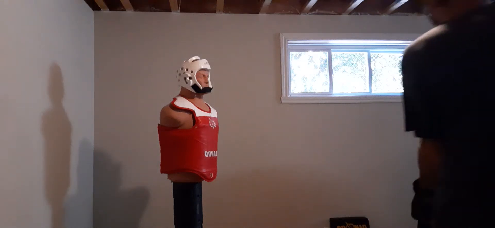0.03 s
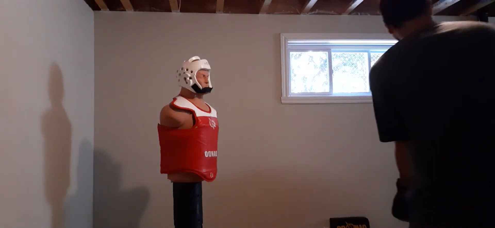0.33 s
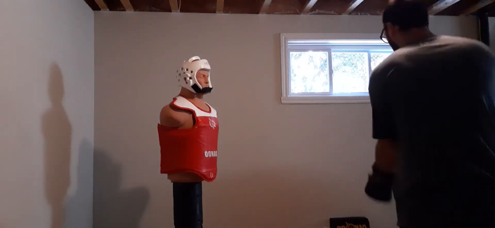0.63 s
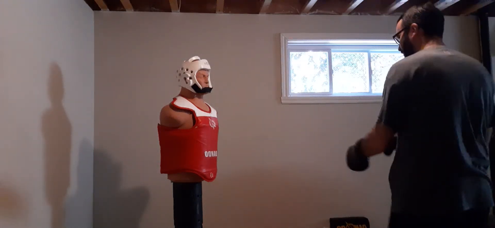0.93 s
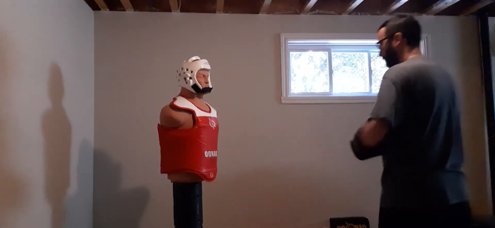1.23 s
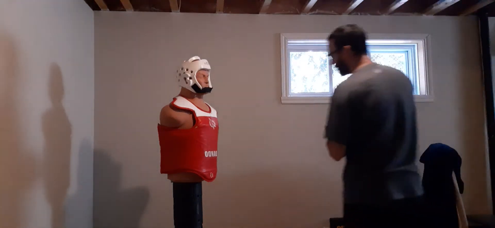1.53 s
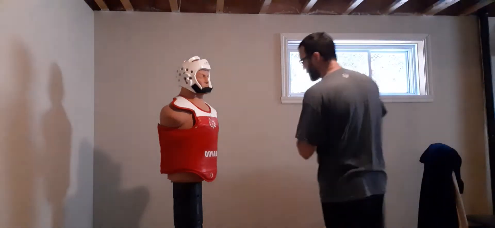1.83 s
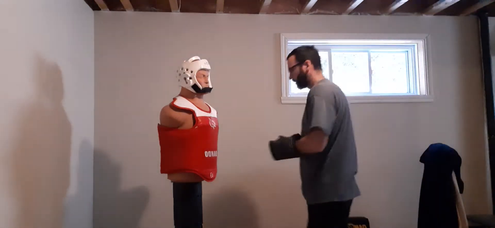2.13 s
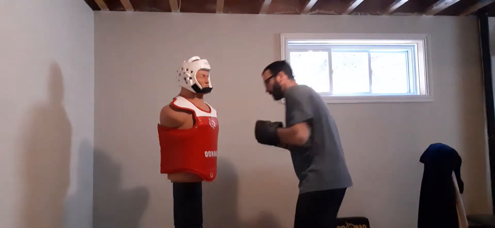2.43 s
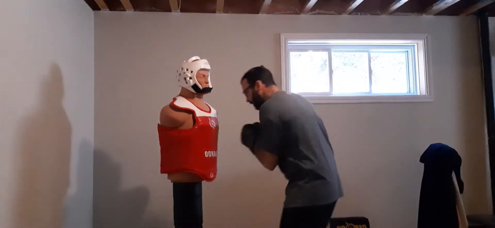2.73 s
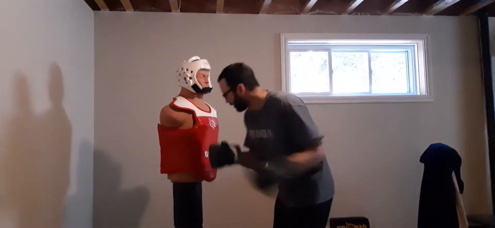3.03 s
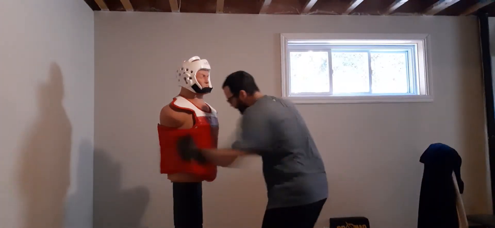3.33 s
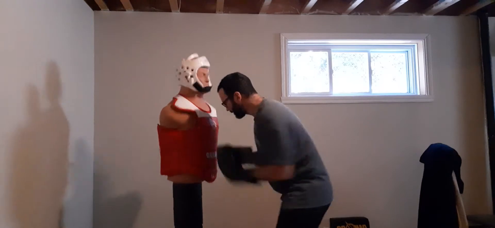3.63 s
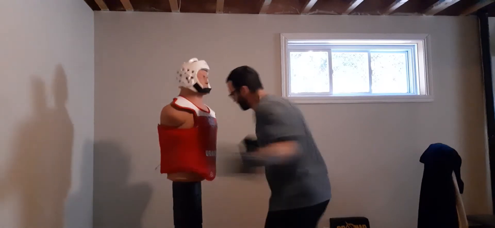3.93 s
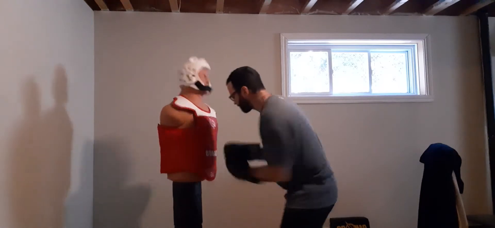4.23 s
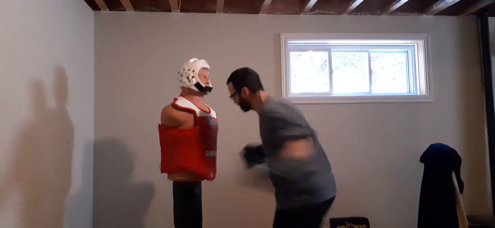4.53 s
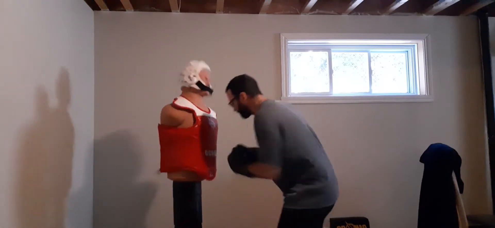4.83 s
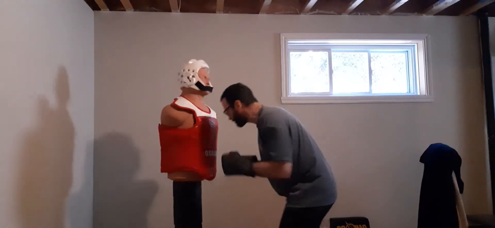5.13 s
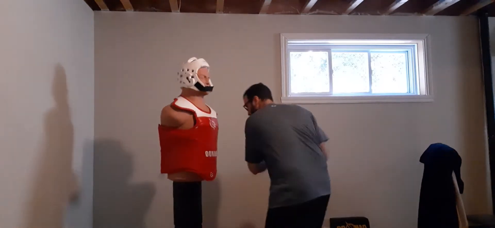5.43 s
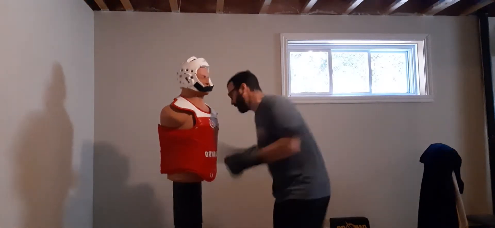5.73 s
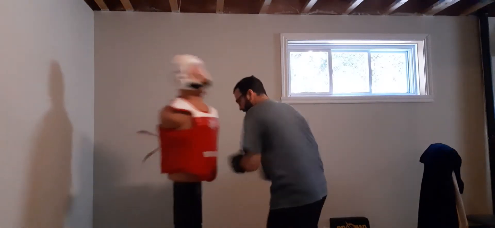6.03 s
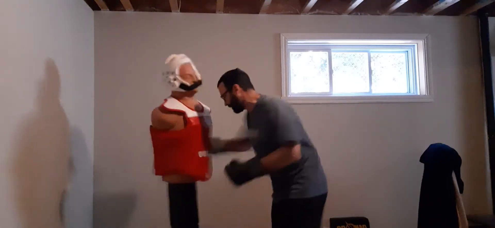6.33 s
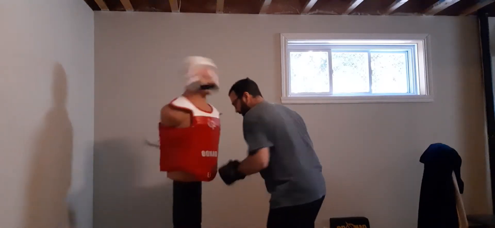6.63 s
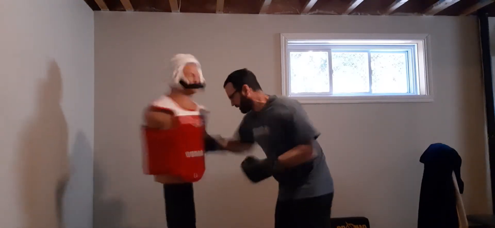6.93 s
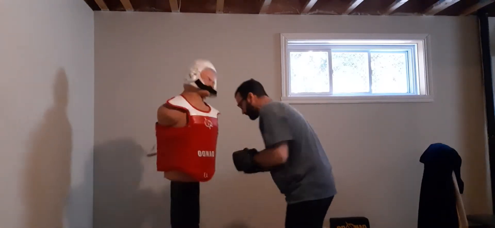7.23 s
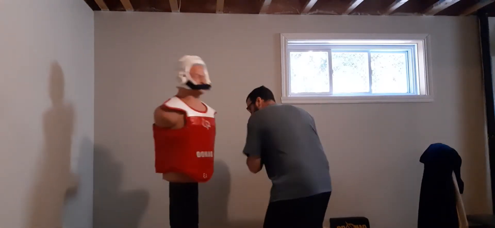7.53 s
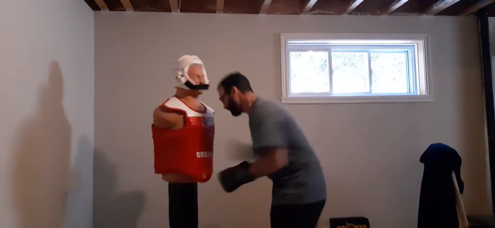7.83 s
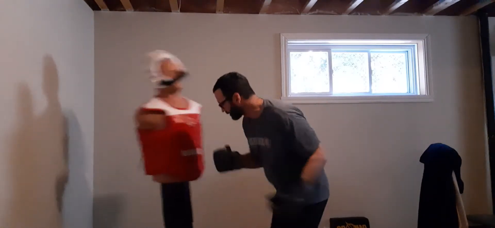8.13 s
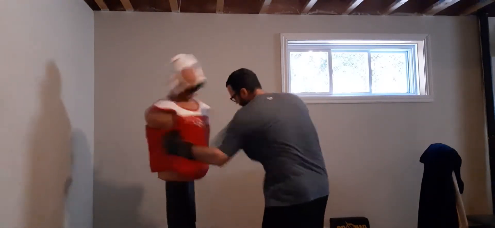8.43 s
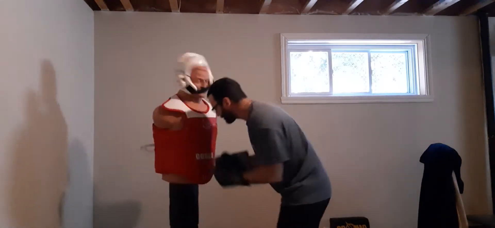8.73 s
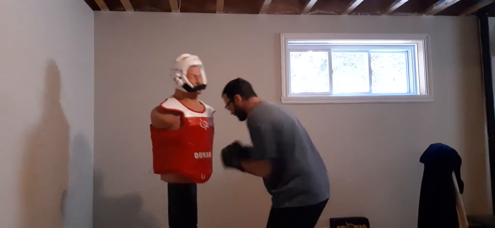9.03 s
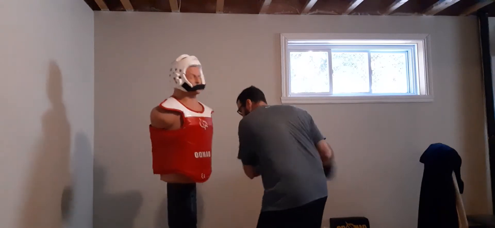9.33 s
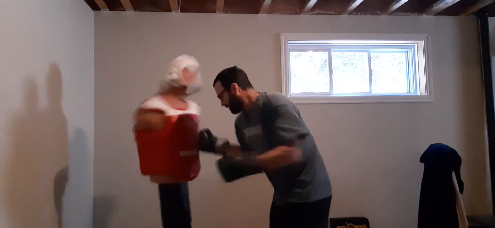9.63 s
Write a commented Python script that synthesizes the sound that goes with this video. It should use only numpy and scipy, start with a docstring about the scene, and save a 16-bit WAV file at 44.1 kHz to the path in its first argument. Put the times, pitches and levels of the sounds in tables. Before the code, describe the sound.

In a small, bare room, nine punches from boxing gloves pop and slap against a padded dummy, about half a second to a second apart. Before them come only quiet steps, light taps and swishing clothes. After each hit the dummy's base knocks dully and its vest rustles, while soles slide now and then. The blows are loud and close in stereo, with a short echo off the walls.

```python
"""Clothes swish and shoes scuff close to a stereo microphone in a small, bare basement room: a boxer
shuffles up to a padded dummy, then lands nine gloved punches in quick flurries. Each is a low push,
a hollow pop of the glove and a slap of vinyl. The dummy rocks on its base, knocking faster and fainter
while its vest rustles, until it settles or the next punch lands. The walls ring, and the microphones
overload on the blows."""
import sys
import numpy as np
from scipy import signal
from scipy.fft import rfft, irfft, next_fast_len
from scipy.io import wavfile

SR = 44100
rng = np.random.default_rng(int(sys.argv[2]) if len(sys.argv) > 2 else 0)


def inscribe(sig):
    """Save sig as 16-bit PCM at rate SR to the path in sys.argv[1].

    A 1-D sig is mono; a 2-D sig holds one channel per row.
    Samples are clipped to [-1, 1] before scaling.
    """
    pcm = np.round(np.clip(np.atleast_2d(sig).T, -1, 1) * 32767)
    wavfile.write(sys.argv[1], SR, pcm.astype(np.int16))


N = 436590

# the blows, levels before each layer's gain: (time [s], pop pitch [Hz], pop [dB], thud [dB], chest [dB],
# slap [dB], fold [dB], time to tip back [s], back knock [dB], forward knock [dB])
PUNCHES = [(3.3888, 608, -17, -25, -25.5, -22.5, -32, 0.23, -38, -45),
           (4.0245, 540, -14.5, -27, -27, -22.5, -27.5, .238, -37.5, -64.5),
           (4.6405, 562, -15, -25.5, -31.5, -22, -24.5, 0.24, -34.5, -54.5),
           (5.7811, 588, -17.5, -28, -30.5, -29, -46, .261, -38, -43.5),
           (6.3535, 622, -17, -25, -21, -23.5, -23.5, 0.25, -39.5, -47),
           (6.9278, 566, -19, -23.5, -22.5, -22, -38, .243, -41.5, -47.5),
           (7.89, 650, -15.5, -25, -26.5, -23.5, -26, .306, -29, -52.5),
           (8.4124, 609.3, -16, -27, -23.5, -26, -22.5, 0.24, -37.5, -35.5),
           (9.6032, 652, -15, -30.5, -26, -21.5, -22, .289, -36, -48)]
# spectra of rubbing cloth, a light touch and a heavy push: (frequency [Hz], level [dB])
CLOTH = [(400, -34), (1300, 2.5), (2100, 1.5), (4000, -2.5), (6500, -3.5), (8500, -9), (12000, -6.5),
         (16000, -13)]
TAP = [(60, -20.5), (160, -6), (250, -2), (600, -1), (1500, -4), (1900, -17.5), (4000, -40.5), (8000, -54)]
THUD = [(20, -42), (32, -16.5), (46, 0.5), (90, 0), (160, 1.5), (300, -6), (500, -16.5), (1500, -29.5),
        (5000, -96)]


def amp(db):
    """Decibels to gain."""
    return 10 ** (np.asarray(db) / 20)


def unit(x):
    """x at rms 1."""
    return x / np.sqrt(np.mean(x ** 2) + 1e-20)


def along(points, hz):
    """(frequency, value) points read on a log axis."""
    f, v = np.transpose(points)
    return np.interp(np.log(hz + 1), np.log(f + 1), v)


def add(track, s, x):
    """Mix x into track from time s."""
    i = max(0, round(s * SR))
    part = x[..., :max(0, track.shape[-1] - i)]
    track[..., i:i + part.shape[-1]] += part


def coloured(x, spectrum, size=4096):
    """x through a minimum-phase filter with the given spectrum, at energy 1."""
    cepstrum = irfft(np.log(amp(along(spectrum, np.fft.rfftfreq(size, 1 / SR)))))
    cepstrum[1:size // 2] *= 2
    cepstrum[size // 2 + 1:] = 0
    y = signal.fftconvolve(x, irfft(np.exp(rfft(cepstrum))))[:len(x)]
    return y / np.linalg.norm(y)


def diffuse(x, spectrum):
    """Two unrelated signals as a field at the microphones: alike in the bass, apart in the treble."""
    # likeness of left and right: (frequency [Hz], correlation [0..1])
    alike = [(100, 0.96), (200, 0.94), (350, 0.73), (700, 0.37), (1400, 0.096), (4000, 0.053),
             (16000, 0.13)]
    hz = np.fft.rfftfreq(x.shape[1], 1 / SR)
    turn = np.arccos(np.clip(along(alike, hz), -1, 1)) / 2
    mid, side = irfft(rfft(x) * amp(along(spectrum, hz)) * [np.cos(turn), np.sin(turn)], x.shape[1])
    return np.array([mid + side, mid - side])


def room(x, direct_db, build_s, ring, walls_db=-11, tail_db=-2, modes_db=-8, wall_hz=3500):
    """A short sound across the basement: direct path, echoes, modes and tail; ring scales the decays."""
    # decay of the diffuse tail: (frequency [Hz], t60 [s])
    tail_t60 = [(60, 0.3), (300, 0.6), (700, 0.56), (1500, 0.61), (4000, 0.57), (7000, 0.51), (11000, 0.43),
                (16000, 0.36)]
    # colour of the tail: (frequency [Hz], level [dB])
    tail_colour = [(30, -45.5), (60, 8), (150, 0), (400, -1), (1500, 2), (5000, 1), (16000, -6)]
    # early echoes from floor, ceiling and walls: (delay [s], level [dB], left lead [s])
    walls = [(.0015, -16.5, 0), (.0048, -34.5, .0001), (.007, -8.5, -.0002), (0.0156, -6.5, .0003),
             (.019, -13.5, -.0001), (0.0264, -15.5, .0002), (.033, -4, -.0003), (0.0537, -6, .0001)]
    # standing waves: (frequency [Hz], level [dB], t60 [s])
    modes = [(51.4, -43, 0.7), (71.5, -43, 0.18), (82.7, -39, 0.37), (125.3, -43.5, 0.39),
             (184.6, -49, 0.54), (230.4, -46.5, 0.45), (290.8, -50, 0.5), (357.7, -42, 0.4),
             (458.3, -41.5, 0.45), (570, -55.5, 0.62), (689, -43, 0.3)]
    t = np.arange(SR * 3 // 4) / SR
    hz, frames, noise = signal.stft(rng.standard_normal((2, len(t))), SR, nperseg=256)
    decay = amp(-60 * frames / ring / along(tail_t60, hz)[:, None])
    tail = signal.istft(noise * decay, SR, nperseg=256)[1][:, :len(t)]
    tail = diffuse(tail * (1 - np.exp(-t / build_s)), tail_colour)
    response = amp(tail_db) * tail / np.linalg.norm(tail[0])
    echoes = np.zeros_like(response)
    for delay, db, lead in walls:
        arrival = delay + .00025 * rng.standard_normal()  # no two blows land on the same spot
        add(echoes[0], arrival - lead / 2, amp([db]))
        add(echoes[1], arrival + lead / 2, amp([db]))
    soften = np.exp(-2 * np.pi * wall_hz / SR)  # the bounce loses treble
    response += amp(walls_db) * signal.lfilter([1 - soften], [1, -soften], echoes)
    swell = 1 - np.exp(-t / .018)
    for mode_hz, db, t60 in modes:
        envelope = swell * amp(modes_db + db + 2 * rng.standard_normal() - 60 * t / ring / t60)
        response += envelope * np.sin(2 * np.pi * mode_hz * t)
    response[:, 0] += amp(direct_db)
    fade = 1 - (t / t[-1]) ** 8
    return signal.fftconvolve(x[None], response * fade, axes=1)


def room_tone(level_db=-65, shuffle_db=-63, shuffle_s=.51, shuffle_width_s=.65):
    """The faint steady rush of the basement, and the boxer's first slow shuffle beside the microphones."""
    # the still room: (frequency [Hz], level [dB])
    rush = [(15, -33.5), (25, -18), (134, -4), (236, -18.5), (796, -11.5), (911, -22.5), (1400, -12.5),
            (2760, -29.5), (4490, -23.5), (6560, -30.5), (9320, -41), (12900, -36), (16000, -42.5)]
    hush = amp(level_db) * unit(diffuse(rng.standard_normal((2, N)), rush))
    near = np.exp(-((np.arange(N) / SR - shuffle_s) / shuffle_width_s) ** 2)
    return hush + amp(shuffle_db) * near * unit(diffuse(rng.standard_normal((2, N)), TAP))


def rub(spectrum, s, width_s, wet, ring_t60, grain_db):
    """A stroke of grainy friction around time s, drawn out by the room. Returns start time and sound."""
    t = np.arange(SR * 3 // 4) / SR - 1 / 4
    stroke = np.exp(-(t / width_s) ** 2)
    keep = amp(-120 / (ring_t60 * SR))  # share of the power left after one sample
    power = stroke + wet * signal.lfilter([1 - keep], [1, -keep], stroke)
    noise = rng.standard_normal((2, len(t)))
    grains = amp(grain_db * np.repeat(rng.uniform(-1, 1, len(t)), 32)[:len(t)])
    sound = unit(diffuse(noise * grains, spectrum)) * np.sqrt(power / power.max())
    return s + t[0], sound[:, s + t >= 0]


def swish(s, width_s, hiss_db, body_db):
    """Cloth slides over cloth: fine grains swell and fade around time s. Returns start time and sound."""
    start, hiss = rub(CLOTH, s, width_s, wet=1.2, ring_t60=.48, grain_db=5)
    start, body = rub(TAP, s, width_s, wet=1.2, ring_t60=.48, grain_db=5)
    return start, amp(hiss_db) * hiss + amp(body_db) * body


def shirt(sleeve_lead_s=.02):
    """The shirt swishes with each big move, and a sleeve just before each punch lands."""
    # the boxer turns and raises his guard: (time [s], half length [s], hiss [dB], body [dB])
    moves = [(.04, 0.17, -60.5, -60.5), (0.577, 0.039, -51, -47), (1.456, 0.06, -58, -58.5),
             (1.84, 0.13, -73, -59.5), (2.169, 0.052, -63.5, -60), (2.324, 0.032, -52.5, -58.5),
             (2.975, 0.05, -54, -57.5), (3.121, 0.021, -43.5, -63), (3.213, .05, -56.5, -60.5),
             (9.075, 0.075, -52, -51.5)]
    out = np.zeros((2, N))
    for move in moves:
        add(out, *swish(*move))
    for s, *_ in PUNCHES:
        add(out, *swish(s - sleeve_lead_s, width_s=.012, hiss_db=-57, body_db=-57))
    return out


def contact(spectrum):
    """One push of air, shaped by the softness of what meets."""
    return coloured(signal.unit_impulse(SR // 4), spectrum)


def tap(body_db, scuff_db):
    """One soft, brief contact heard through the room."""
    touch = amp(body_db) * contact(TAP) + amp(scuff_db) * contact(CLOTH)
    return room(touch, direct_db=-15, build_s=.004, ring=.7)


def fidget(body_db=-33, scuff_db=-37, spread_db=5, count=30):
    """The boxer is never still: gloves and soles tick faintly at random."""
    out = np.zeros((2, N))
    for when, body, scuff in rng.random((count, 3)):
        add(out, when * N / SR, tap(body_db - spread_db * body, scuff_db - spread_db * scuff))
    return out


def taps(body_gain_db=31, scuff_gain_db=30):
    """Gloves touch and soles catch on the way to the dummy."""
    # footfalls and light touches of the gloves: (time [s], body [dB], scuff [dB])
    touches = [(.732, -47.5, -48), (.915, -36.5, -39), (.925, -40.5, -38), (0.991, -55, -51),
               (1.223, -51, -55.5), (1.574, -56, -44), (1.775, -63, -61.5), (2.145, -72, -52.5),
               (2.525, -59, -68), (2.645, -58.5, -59.5), (2.809, -51, -47)]
    out = np.zeros((2, N))
    for s, body_db, scuff_db in touches:
        add(out, s, tap(body_db + body_gain_db, scuff_db + scuff_gain_db))
    return out


def slides(body_gain_db=22, scuff_gain_db=29, chafe_gain_db=-3, chafe_lag_s=.015):
    """A sole lands and slides a little; stick and slip gathers the friction into one narrow band."""
    # sliding steps: (time [s], level [dB], chafing note [Hz])
    steps = [(0.822, -51, 2190), (1.374, -64, 1790), (3.19, -45, 2300), (5.469, -53, 2430),
             (5.719, -50, 2330), (7.791, -53.5, 2210), (9.31, -49.5, 2350), (9.546, -49, 2400)]
    out = np.zeros((2, N))
    for s, db, hz in steps:
        add(out, s, tap(db + body_gain_db, db + scuff_gain_db))
        band = [(hz / 4, -70), (hz / 1.35, -20), (hz, 0), (hz * 1.35, -16), (hz * 4, -50)]
        start, chafe = rub(band, s + chafe_lag_s, width_s=.014, wet=1, ring_t60=.33, grain_db=8)
        add(out, start, amp(db + chafe_gain_db) * chafe)
    return out


def cushioned(x, cutoff_hz=2800):
    """A soft contact carries no sharp edge."""
    return signal.sosfilt(signal.butter(3, cutoff_hz, fs=SR, output="sos"), x)


def bump(thud_db, knock_db):
    """One dull, low bump with a short ring."""
    # spectrum of the knock: (frequency [Hz], level [dB])
    knock = [(50, -9), (130, -9.5), (280, 1.5), (450, -6), (800, -7), (1500, -15), (2000, -29.5),
             (6000, -20.5), (16000, -38.5)]
    impact = amp(thud_db) * contact(THUD) + amp(knock_db) * contact(knock)
    return room(cushioned(impact), direct_db=-12, build_s=.005, ring=.55)


def low_knocks(thud_gain_db=33, knock_gain_db=31):
    """Scattered dull, low knocks, mostly the dummy rocking or rebounding."""
    # single dull knocks: (time [s], level [dB])
    knocks = [(2.376, -58), (3.797, -52), (6.262, -48), (6.489, -36), (7.689, -54), (9.36, -59)]
    out = np.zeros((2, N))
    for s, db in knocks:
        add(out, s, bump(db + thud_gain_db, db + knock_gain_db))
    return out


def glove_pop(hz, t60=.013):
    """The air trapped under the glove rings for a few cycles."""
    # colour of the pop: (frequency [Hz], level [dB])
    hollow = [(40, -19.5), (200, -15.5), (380, 6.5), (550, 1.5), (760, 5), (950, 2), (1500, 4.5),
              (1850, 11), (4000, -24.5), (12000, -38.5)]
    t = np.arange(SR // 4) / SR
    return coloured(np.cos(2 * np.pi * hz * t) * amp(-60 * t / t60), hollow)


def heave(hz=52, peak_s=.024, width_s=.023):
    """The whole torso gives way and shoves the air for a cycle or two."""
    t = np.arange(SR // 8) / SR
    return np.sin(2 * np.pi * hz * t) * np.exp(-((t - peak_s) / width_s) ** 2)


def crumple(spectrum, rise_s, t60, grain_db):
    """Vinyl or foam gives in a brief spray of tiny snaps, at energy 1 in each microphone."""
    t = np.arange(SR // 4) / SR
    noise = rng.standard_normal((2, len(t)))
    snaps = noise * amp(grain_db * np.repeat(rng.standard_normal(len(t)), 16)[:len(t)])
    shape = (1 - np.exp(-t / rise_s)) * amp(-60 * t / t60)
    return np.array([coloured(side * shape, spectrum) for side in snaps])


def punches(fold_delay_s=.0037, rebound_delay_s=.134):
    """Padding takes the push, chest and glove pop, vinyl slaps and folds; the torso swings on its post."""
    # spectra of the hollow chest, the vinyl's slap and crack, and the torso meeting its post:
    # (frequency [Hz], level [dB])
    chest = [(60, -19.5), (200, -7.5), (320, -3), (420, -13.5), (800, -39), (3000, -56)]
    slap = [(300, -49), (1000, 3.5), (1500, 17), (1900, 5), (3800, 5.5), (6500, -2), (9000, -7.5),
            (16000, -10)]
    crack = [(2000, -39), (6000, -10), (8500, -13.5), (11500, -6.5), (14000, -8), (16000, -16)]
    post = [(40, 1), (70, -2), (130, 2.5), (300, -2.5), (420, -24), (1000, -9), (2000, -27.5),
            (8000, -77.5)]
    out = np.zeros((2, N))
    for s, pop_hz, pop_db, thud_db, chest_db, slap_db, fold_db, *_ in PUNCHES:
        blow = amp(thud_db + 33) * contact(THUD)
        blow += amp(chest_db + 33) * contact(chest)
        blow += amp(pop_db + 34.5) * glove_pop(pop_hz)
        blow += amp(slap_db + 35) * contact(slap)
        add(out, s, room(-blow, direct_db=-14, build_s=.0016, ring=.84))
        # the heave and the first bite of leather on vinyl reach the microphones directly
        add(out, s, amp(thud_db + 5) * heave())
        add(out, s, -amp(slap_db + 20) * contact(slap))
        add(out, s, amp(slap_db + 25) * crumple(slap, rise_s=.0002, t60=.014, grain_db=3))
        fold_s = s + fold_delay_s
        snap = amp(9.5) * contact(crack)  # equally strong in every punch
        add(out, fold_s, room(snap, direct_db=-23.5, build_s=.00044, ring=.78))
        add(out, fold_s, amp(fold_db + 28) * crumple(crack, rise_s=.001, t60=.018, grain_db=3))
        rebound = amp(thud_db + 24) * cushioned(contact(post))
        add(out, s + rebound_delay_s, room(rebound, direct_db=-5, build_s=.002, ring=.5))
    return out


def until_next():
    """Each punch with the time at which the next one, or the end, cuts its motion short."""
    return zip(PUNCHES, [row[0] for row in PUNCHES[1:]] + [N / SR])


def rocking_base(thud_gain_db=30, knock_gain_db=35, first_gap_s=.206, gap_shrink=.82, rock_loss_db=12.5):
    """The weighted base tips back, forward and back again, quicker and weaker, jolting the head guard."""
    out = np.zeros((2, N))
    for (s, *_, tip_s, back_db, forward_db), end in until_next():
        s += tip_s
        for k in range(3):
            db = (back_db, forward_db)[k % 2] - rock_loss_db * (k // 2)
            if s < end:
                add(out, s, bump(db + thud_gain_db, db + knock_gain_db))
                add(out, s, rattle(db))
            s += first_gap_s * gap_shrink ** k
    return out


def rattle(jolt_db, follows=.65, gain_db=8):
    """Straps and foam of the head guard chatter, following only part of the jolt's level."""
    return amp(follows * jolt_db + gain_db) * crumple(CLOTH, rise_s=.008, t60=.4, grain_db=4.5)


def vest(hiss_db=-50, body_db=-52, width_s=.051, first_s=.245, swing_s=.205, swing_loss_db=3.5, count=4):
    """The vest and head guard rustle at every swing of the dummy, fainter each time."""
    out = np.zeros((2, N))
    for (s, *_), end in until_next():
        for k in range(count):
            turn_s = s + first_s + k * swing_s
            loss_db = k * swing_loss_db
            if turn_s < end:
                add(out, *swish(turn_s, width_s, hiss_db - loss_db, body_db - loss_db))
    return out


def scene():
    """Dummy, boxer and basement, a little stronger in the right microphone."""
    dummy = punches() + rocking_base() + vest() + low_knocks()
    boxer = taps() + slides() + shirt() + fidget()
    return (dummy + boxer + room_tone()) * amp([[-.2], [.2]])


def record(dry, ceiling=.95, low_cut_hz=36, top_hz=16150, taper_hz=400):
    """The microphones round off the peaks of the blows and lose the deepest bass and highest treble."""
    squeezed = dry / (1 + np.abs(dry / ceiling) ** 4) ** (1 / 4)
    trimmed = signal.sosfilt(signal.butter(6, low_cut_hz, "highpass", fs=SR, output="sos"), squeezed)
    size = next_fast_len(N + SR // 4)
    passed = np.clip((top_hz - np.fft.rfftfreq(size, 1 / SR)) / taper_hz, 0, 1)
    return irfft(rfft(trimmed, size) * np.sin(np.pi / 2 * passed) ** 2, size)[:, :N]


dry = scene()
out = record(dry)
inscribe(out)
```